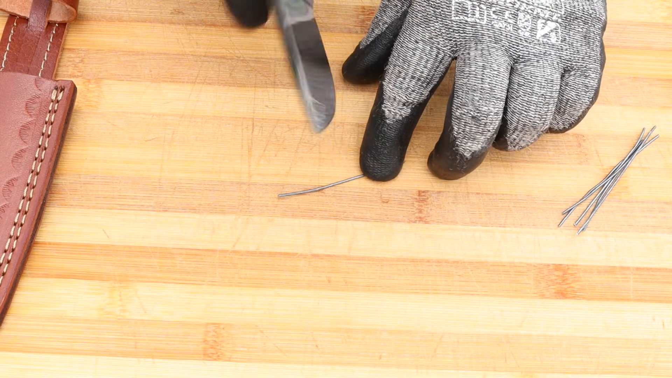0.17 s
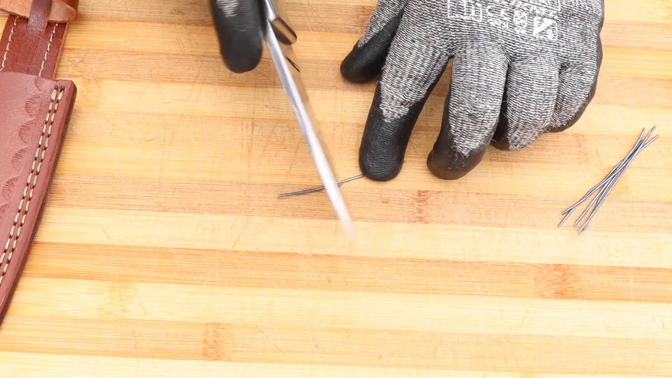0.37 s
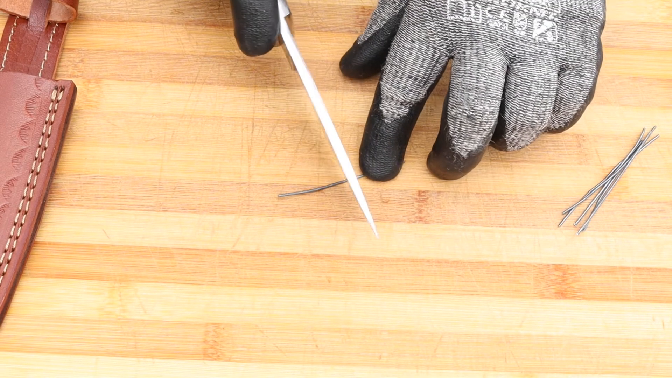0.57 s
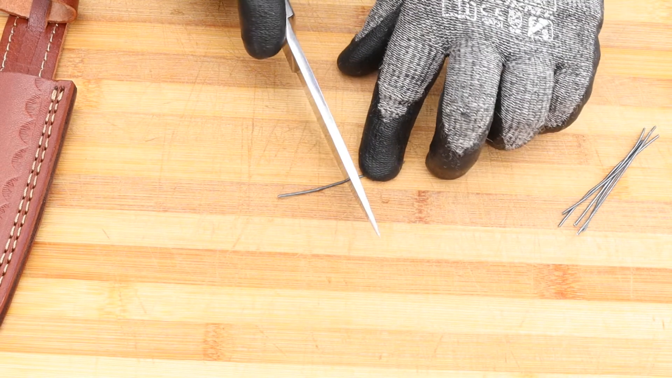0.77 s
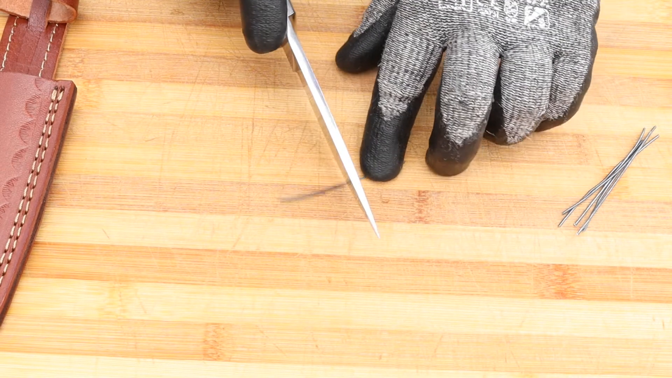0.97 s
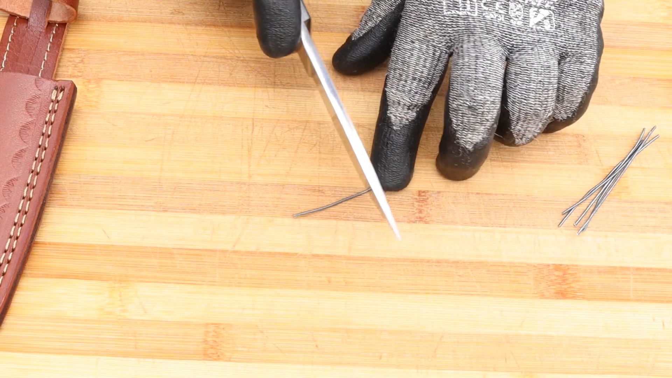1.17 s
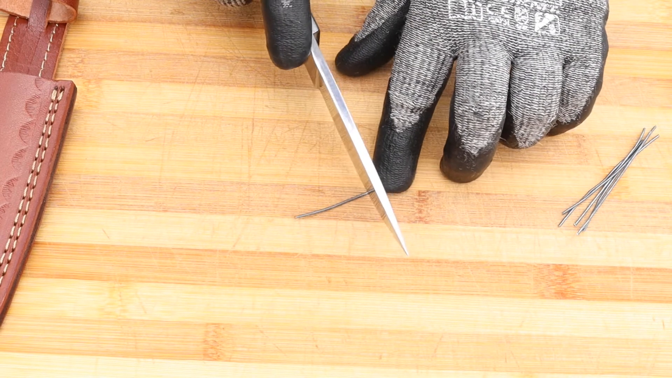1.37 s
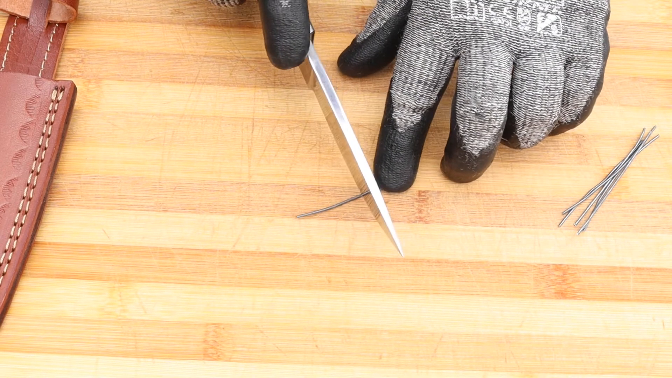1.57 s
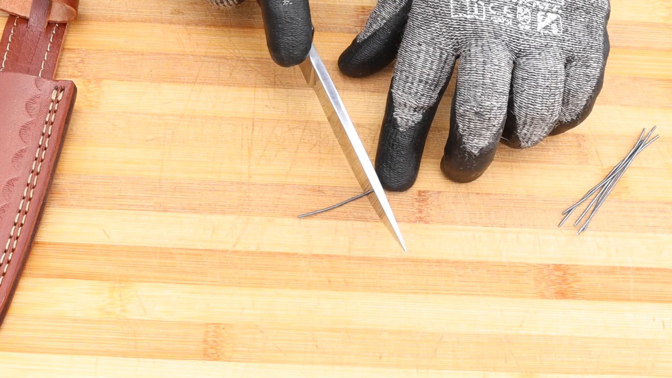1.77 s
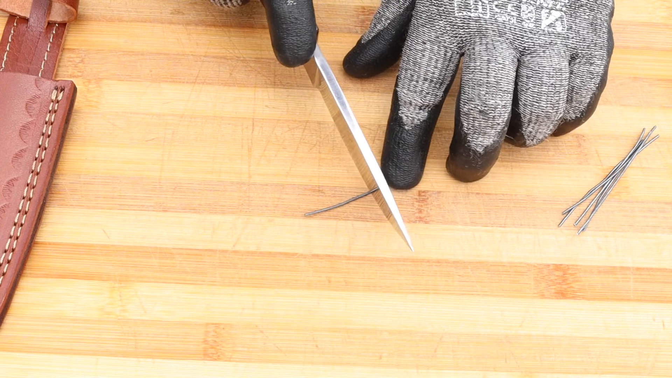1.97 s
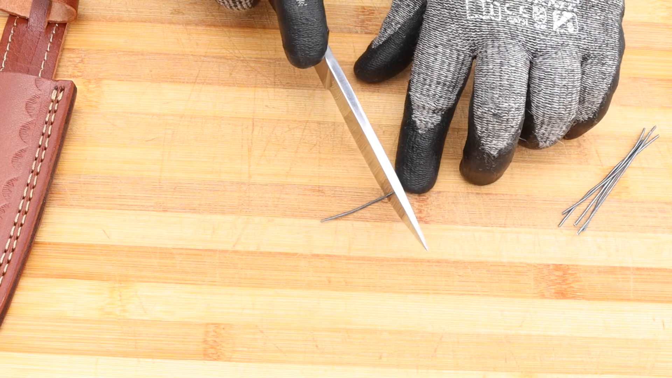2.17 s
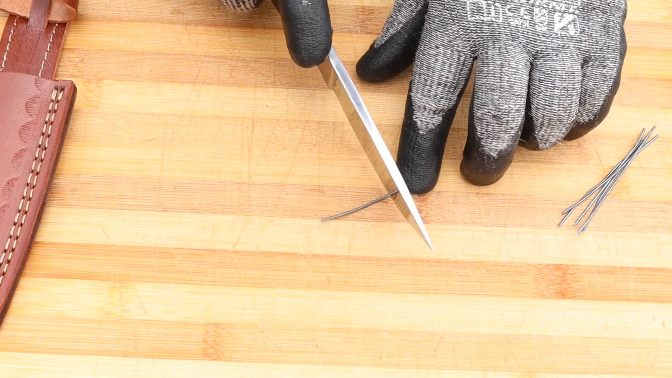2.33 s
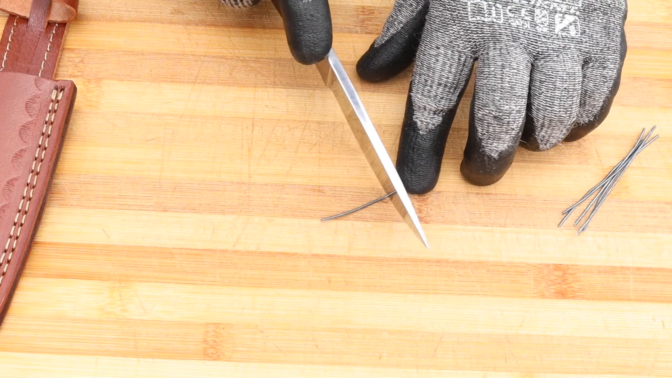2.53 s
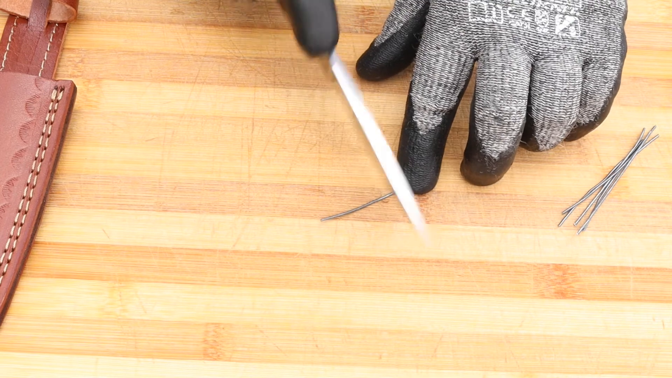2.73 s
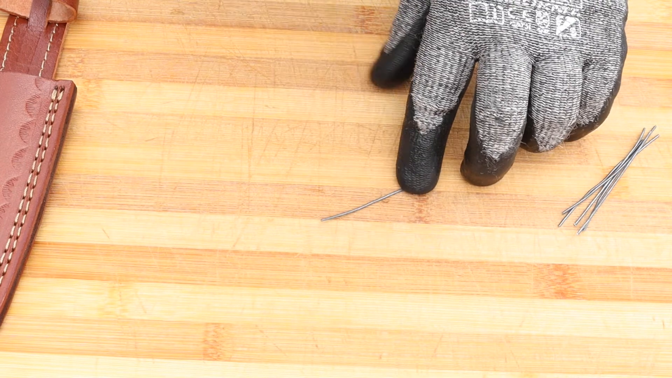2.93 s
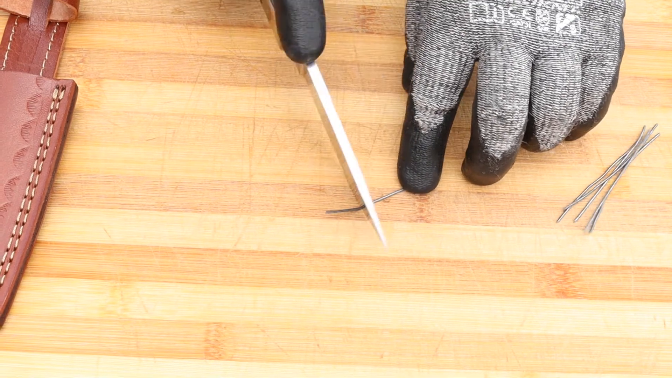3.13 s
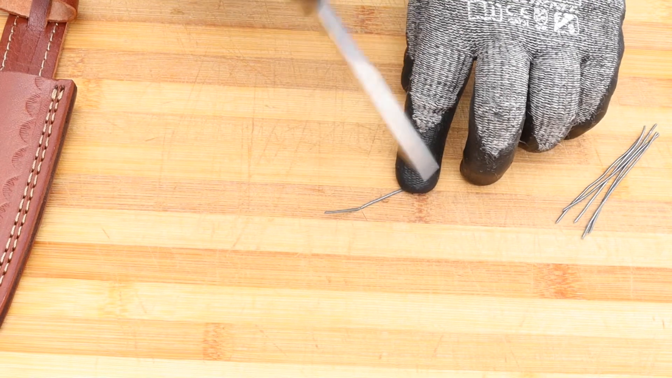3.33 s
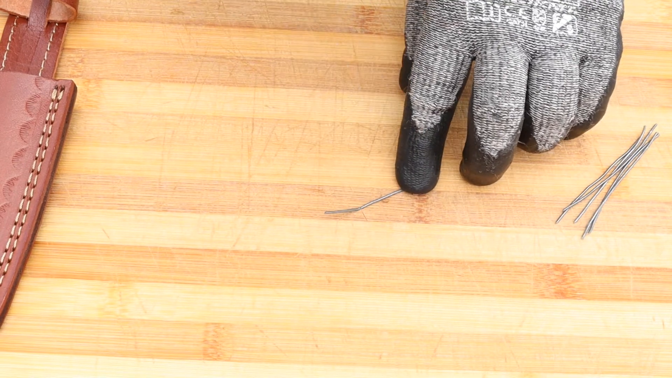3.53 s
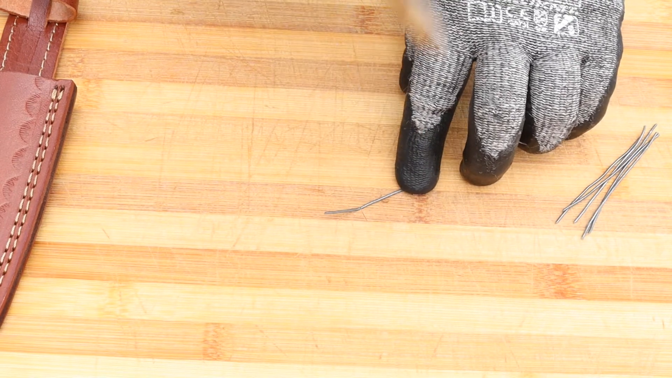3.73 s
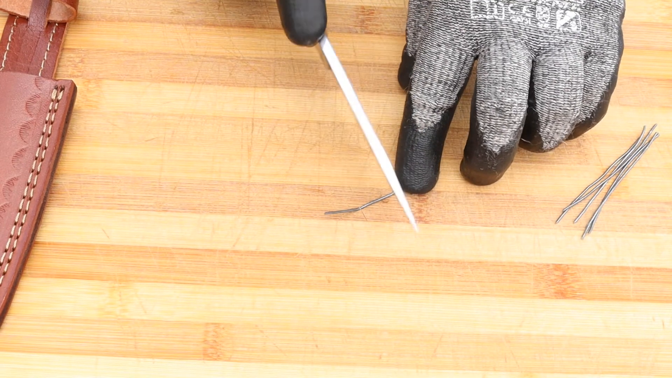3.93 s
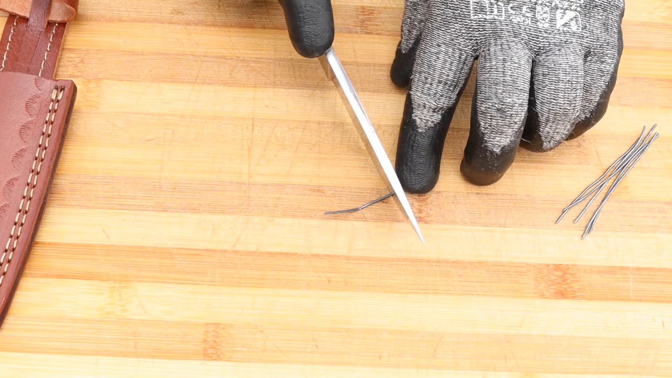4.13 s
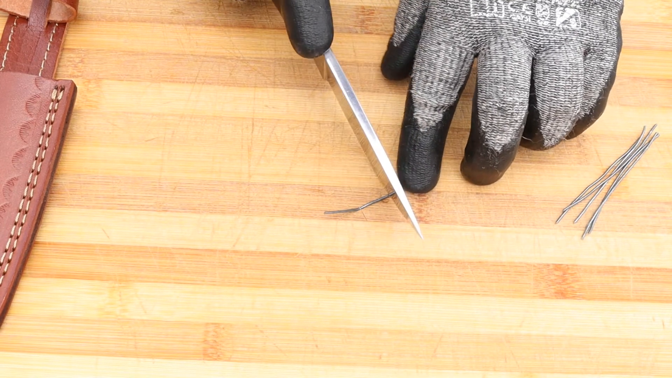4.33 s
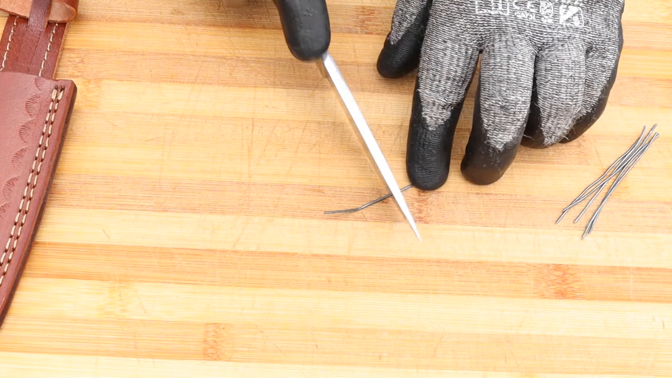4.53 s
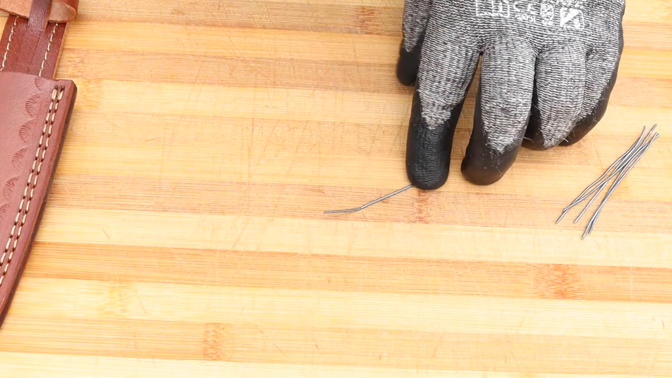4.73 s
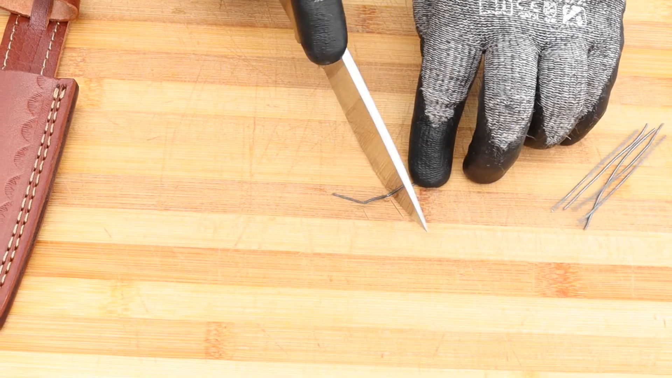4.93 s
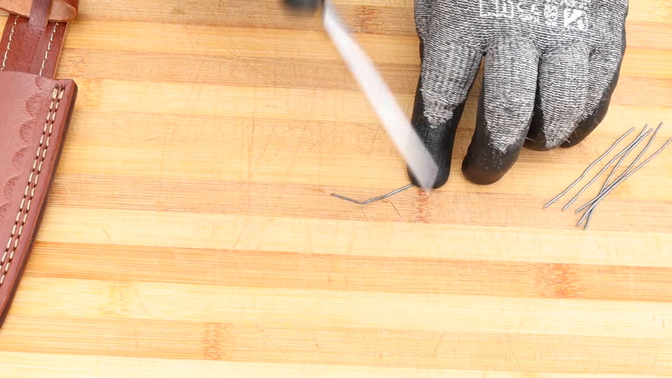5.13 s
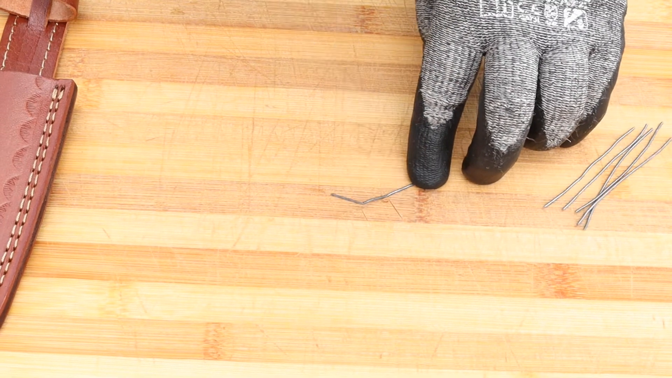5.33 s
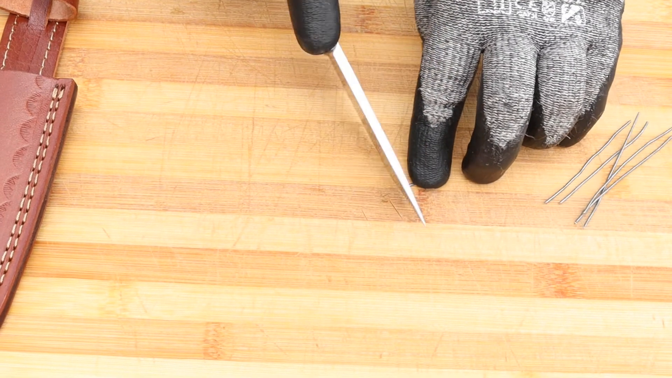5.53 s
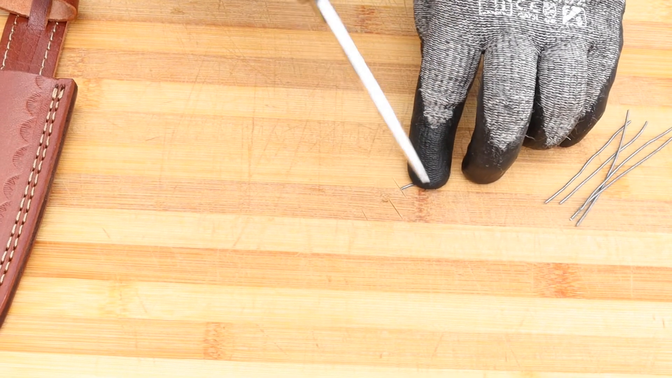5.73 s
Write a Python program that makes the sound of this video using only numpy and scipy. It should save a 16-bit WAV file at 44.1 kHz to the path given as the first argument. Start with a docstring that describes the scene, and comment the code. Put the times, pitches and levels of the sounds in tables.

```python
"""A steel knife is chopped and pressed onto thin wire lying on a wooden board, outdoors.
Each contact is a set of short fading tones (the board and blade ringing) plus a crack of noise.
Walls nearby send back dull echoes, made from a scatter of noise. Scrapes, glove rustle, air hiss, an engine
drone, street murmur and wind are shaped noise and one wavering tone. Hard chops overload the recorder and
make its gain control duck."""
import sys
import numpy as np
from scipy import signal
from scipy.io import wavfile

SR = 44100
rng = np.random.default_rng(int(sys.argv[2]) if len(sys.argv) > 2 else 0)


def volts_from_db(level):
    """Convert decibel levels to linear amplitude ratios."""
    exponent = np.asarray(level, float) / 20
    return 10 ** exponent


def to_wav(s):
    """Save 16-bit WAV."""
    ch = np.atleast_2d(s).T  # columns
    pcm = np.round(np.clip(ch, -1, 1) * 32767)  # PCM
    wavfile.write(sys.argv[1], SR, pcm.astype(np.int16))


N = 255424
LEAD = round(0.3 * SR)   # samples made ahead of the start, so that an earlier blow can still ring


def rms_one(x):
    """Scale a sound to an average strength (rms) of 1."""
    return x / np.sqrt(np.mean(x ** 2) + 1e-20)


def in_time(rows):
    """Draw straight lines between timed rows: one curve for each column after the time."""
    s, *columns = np.transpose(rows)
    return [np.interp(np.arange(N) / SR, s, column) for column in columns]


def at_hz(points, hz):
    """Read a level off a curve of (Hz, dB) points, with pitch on a log scale."""
    points = np.array(points)
    return np.interp(np.log(hz), np.log(points[:, 0]), points[:, 1])


def drift(rate_hz):
    """Slow chance of spread 1: noise passed twice through a one-pole low-pass."""
    step = 40   # samples between the points computed
    r = np.exp(-2 * np.pi * step * rate_hz / SR)
    noise = rng.standard_normal(N // step + 2002)
    slow = signal.lfilter([1], [1, -2 * r, r * r], noise)[2000:]   # skip the filter's start
    return np.interp(np.arange(N) / step, np.arange(len(slow)), rms_one(slow))


def coloured_noise(spectrum, patchy_db, rate_hz):
    """Third-octave bands of noise, flickering partly together and partly alone; rms 1."""
    edges = spectrum[0][0] * 2 ** (np.arange(40) / 3)
    edges = edges[edges < min(spectrum[-1][0] * 1.3, 0.45 * SR)]
    out, together, white = 0, drift(rate_hz), rng.standard_normal((2, N))
    for k, (low, high) in enumerate(zip(edges, edges[1:])):
        band_filter = signal.butter(2, [low, high], "band", fs=SR, output="sos")
        band = signal.sosfilt(band_filter, white[k % 2])   # neighbours use different noise
        level_db = at_hz(spectrum, np.sqrt(low * high))
        out = out + band * volts_from_db(level_db + patchy_db * (together + drift(rate_hz)))
    return rms_one(out)


def all_blows():
    """List every contact and tick as time, force and colour; harder contacts get a slightly duller edge."""
    # blade on wire and board: start_s [s], force_db [dB], thump_db, middle_db, upper_ring_db [dB]
    contacts = [(-0.17, 12.5, 4, -46, -2), (0.5, 2, -36, 2.5, -3.5), (0.5288, -14.5, -1, -1, -13),
                (0.6827, -3.5, -8, 0.5, -4.5), (0.6931, -16, 16, -15, -4), (0.6985, -14, -17, -1, -10),
                (1.066, -27, -14, -5, -3), (1.5460, -9.5, 21.5, -1.5, 7), (1.5666, -11.5, -3, -4, -7),
                (1.6837, -15.5, 20.5, -2, -6.5), (1.6949, -23, 20, 10.5, -5), (1.794, -20, 25, 10, -29),
                (1.805, -11.5, 4, -41, -14.5), (1.8134, -14, 6, -6, -25), (2.0095, -13.5, 16, -13, -11.5),
                (2.0230, -14.5, -11, -12, -14), (2.2765, -18.5, -12, -22, -16),
                (2.5638, -1.5, -4, -5, -10.5), (2.5672, -7, -8, -11, 1), (2.7, 0.5, -24, 2.5, -4),
                (2.707, -7, 13.5, -7, -8.5), (3.12, 17.5, -37, 3, 3.5), (4.2062, -19, 26.5, -61, 13),
                (4.3294, -8.5, 24, -21, 0), (4.3313, -1, -25, -28, -9.5), (4.341, -11.5, 29, 2.5, 9.5),
                (4.924, 16.5, -32, 5, 3.5), (5.4748, 16.5, -30, 5, 1)]
    # the loose wire end ticks on the steel: start_s [s], force_db [dB]
    ticks = [(2.575, -26), (2.713, -40), (3.2200, -24.5), (4.2170, -35), (4.9840, -29), (5.453, -37)]
    # colour of every tick: thump_db, middle_db, upper_ring_db, steel_edge_db [dB]
    tick_colour = [11, 13, 13, 23]
    blows = []
    for row in contacts:
        steel_edge_db = 3.5 + 0.63 * row[-1] - 0.078 * row[1]   # from upper ring and force
        blows.append((*row, steel_edge_db))
    for row in ticks:
        blows.append((*row, *tick_colour))
    return blows


def knife_on_board():
    """Each blow sets all the modes ringing and adds a steel crack; gives the near sound and its first burst."""
    # pitches of the colour points [Hz]: thump, main ring, middle, upper ring, steel edge
    colour_hz = [190, 570, 850, 1230, 3500]
    # board and blade modes: pitch_hz [Hz], level_db [dB], t60_s [s to fade by 60 dB]
    modes = [(208, -30, 0.07), (301, -14.5, 0.019), (455.5, -32, 0.13), (558, -9, 0.052),
             (602, -4.5, 0.033), (773, -1.5, 0.017), (919, -3, 0.015), (1179, -14.5, 0.055),
             (1246.7, -15.5, 0.047), (1303, -13.5, 0.012), (1728, -19.5, 0.02), (1973, -44, 0.09),
             (2646, -27.5, 0.037), (3160, -23.5, 0.019), (4130, -27, 0.018), (5027, -26, 0.021),
             (5990, -31.5, 0.016), (9560, -25, 0.011)]
    detune = 0.01              # pitch spread between spots on the board (a share), wider for high modes
    rise_s = 0.00041           # swell time of a 0 dB contact
    crack_db, crack_t60_s = -19.5, 0.013
    crack_low_hz, crack_high_hz = 1850, 11600   # the upper edge is for 0 dB force and 0 dB steel edge
    burst_t60_s = 0.022        # mostly the first burst of a blow carries as far as the walls

    out, t = np.zeros((2, N + LEAD + SR)), np.arange(SR // 5) / SR
    hz, level_db, t60_s = np.transpose(modes)[:, :, None]
    spread = 1 + hz / 2000     # high modes vary more from blow to blow
    blows = all_blows()
    luck = rng.standard_normal((len(blows), 3, len(modes), 1))
    for (s, force_db, thump_db, *upper_db), (louder, higher, shift) in zip(blows, luck):
        edge_db = upper_db[-1]
        # the main ring follows the force alone, so its colour is 0 dB
        colour_db = at_hz(np.c_[colour_hz, [thump_db, 0, *upper_db]], hz)
        gain = volts_from_db(force_db + colour_db + level_db + spread * louder - 60 * t / t60_s)
        phase = 2 * np.pi * hz * (1 + detune * spread * higher) * t
        phase = phase + shift * np.minimum(hz / 2500, 2)   # high modes arrive out of step
        ring = (gain * np.sin(phase)).sum(axis=0)

        # hard steel blows crack brighter
        top_hz = min(crack_high_hz * volts_from_db(0.24 * force_db + 0.2 * edge_db), 0.4 * SR)
        crack_band = signal.butter(2, [crack_low_hz, top_hz], "band", fs=SR, output="sos")
        crack = signal.sosfilt(crack_band, rng.standard_normal(len(t)))
        crack = crack * volts_from_db(force_db + edge_db + crack_db - 60 * t / crack_t60_s)

        swell = 1 - np.exp(-t / (rise_s * volts_from_db(-0.55 * force_db)))   # light touches swell more slowly
        blow = swell * (ring + crack)
        at = round(s * SR) + LEAD
        out[:, at:at + len(t)] += blow, blow * volts_from_db(-60 * t / burst_t60_s)
    return out[:, :N + LEAD]


def wall_echoes(bursts):
    """Dense dull reflections: noise whose level follows the delay, passed through a few broad peaks."""
    # echoes from the surroundings: delay_s [s], level_db [dB]
    echo_points = [(0.023, -90), (0.037, -50), (.055, -54), (.15, -58), (0.243, -67), (.275, -80),
                   (.33, -79)]
    # what the echoes favour: pitch_hz [Hz], width_hz [Hz], level_db [dB]
    echo_peaks = [(544, 96, 1.5), (850, 270, -10), (1185, 105, 4), (1624, 48, -5), (1806, 50, -3.5),
                  (2770, 780, 1.5), (4320, 2900, -10)]
    delay_s, echo_db = np.transpose(echo_points)
    t = np.arange(round(delay_s[-1] * SR)) / SR
    dense = rng.standard_normal(len(t)) * volts_from_db(np.interp(t, delay_s, echo_db)) * (t > delay_s[0])
    t_lumps = np.arange(0, t[-1] + 0.01, 0.007)
    lumps_db = 1.5 * rng.standard_normal(len(t_lumps))
    dense *= volts_from_db(np.interp(t, t_lumps, lumps_db))   # walls answer in clumps
    response = 0
    for k, (hz, width_hz, peak_db) in enumerate(echo_peaks):
        r = np.exp(-np.pi * width_hz / SR)
        resonance = [1, -2 * r * np.cos(2 * np.pi * hz / SR), r * r]
        peak = signal.lfilter([(1 - r * r) / 2, 0, (r * r - 1) / 2], resonance, dense)
        response = response + (-1) ** k * volts_from_db(peak_db) * peak   # alternate signs
    return signal.fftconvolve(bursts, response)[:len(bursts)]


def scrapes():
    """Blade and glove slide: uneven noise grains through one resonance, swelling and fading each stroke."""
    # sliding on wire and wood: start_s [s], end_s [s], centre_hz [Hz],
    # level_db [dB rms before the swell], width [share of the centre, each way]
    strokes = [(0.34, 0.464, 3350, -54, 0.025), (0.406, 0.595, 1850, -44, 0.29),
               (0.916, 1.317, 7800, -55, .3), (4.38, 4.54, 4700, -52.5, 0.11), (5.35, 5.48, 5560, -57, .2),
               (5.45, 5.72, 4430, -40, 0.17)]
    out, t = np.zeros(N), np.arange(N) / SR
    for start, end, hz, level_db, width in strokes:
        grains = rng.standard_normal(N) * volts_from_db(1.2 * drift(60))
        band = signal.butter(1, [hz / (1 + width), hz * (1 + width)], "band", fs=SR, output="sos")
        stroke = np.sin(np.pi * np.clip((t - start) / (end - start), 0, 1))
        out += volts_from_db(level_db) * stroke * rms_one(signal.sosfilt(band, grains))
    return out


def hiss_and_rustle(murmur_db):
    """Air hiss breathes with the street murmur and swells with each rustle of the glove, then drops back."""
    # the glove rustles as the knife comes down: start_s [s], end_s [s], level_db [dB above the hiss]
    rustles = [(0.155, 0.48, 2.0), (0.845, 1.225, 0.5), (3.005, 3.143, 2.5), (5.392, 5.465, 8)]
    # colour of the hiss: pitch_hz [Hz], level_db [relative dB per Hz]
    hiss_colour = [(1290, -31), (2200, -8.5), (2490, -3), (3650, -3.5), (5000, -2), (5440, -3),
                   (8950, -4.5), (12800, -8.5), (15100, -16), (16000, -19)]
    t = np.arange(N) / SR
    # -51.5 dB at the mean murmur level; 0.53 is the share of the murmur's swing
    level_db = -51.5 + 0.53 * (murmur_db - murmur_db.mean())
    for start, end, rustle_db in rustles:
        rise = np.sin(np.pi / 2 * (t - start) / (end - start))
        level_db = level_db + rustle_db * rise * (t > start) * (t < end)
    return volts_from_db(level_db) * coloured_noise(hiss_colour, patchy_db=1.0, rate_hz=15.6)


def engine_drone():
    """A far engine's low hum: one sine whose pitch slides and whose level wavers."""
    # path of the hum: start_s [s], pitch_hz [Hz], level_db [dB rms before the waver]
    path = list([(1.2, 62.5, -49), (1.256, 66.1, -53), (1.576, 66, -41.5), (1.75, 63, -54),
                 (1.776, 65.6, -40.5), (1.874, 74.7, -48), (2.017, 80, -40), (2.1, 74.6, -57)])
    fade_in = (path[0][0] - 0.1, path[0][1], -80)
    fade_out = (path[-1][0] + 0.083, path[-1][1], -80)
    hz, level_db = in_time([fade_in] + path + [fade_out])
    hum = np.sin(2 * np.pi * np.cumsum(hz) / SR)
    return np.sqrt(2) * volts_from_db(level_db + 2.1 * drift(24)) * hum


def street_murmur(murmur_db):
    """Distant traffic: low and middle noise whose bands flicker slightly."""
    # colour of the murmur: pitch_hz [Hz], level_db [relative dB per Hz]
    murmur_colour = [(71, -50), (120, -1.5), (284, -3), (476, -12.5), (514, -3.5), (607, -9), (838, -8.5),
                     (2600, -20), (3380, -31), (5720, -120)]
    return volts_from_db(murmur_db) * coloured_noise(murmur_colour, patchy_db=0.36, rate_hz=20.0)


def wind(wind_db):
    """Wind on the microphone: very low noise that swells and wavers slowly."""
    # colour of the wind: pitch_hz [Hz], level_db [relative dB per Hz]
    wind_colour = [(16, 13.5), (25, -8.5), (40, -4), (80, -1.5), (130, -14.5), (200, -18)]
    return volts_from_db(wind_db) * coloured_noise(wind_colour, patchy_db=-2.5, rate_hz=4.0)


def scene():
    """Add up the knife, its echoes and the sounds around them, as one channel."""
    # levels of the surroundings: start_s [s], wind_db [dB], murmur_db [dB]
    surroundings = [(0.0, -47, -48), (0.17, -35.5, -45.5), (0.25, -37.5, -45.5), (0.34, -38, -45.5),
                    (0.78, -49, -49.5), (1.0, -43, -44.5), (1.274, -48, -46), (1.52, -40.5, -47),
                    (1.97, -51, -46.5), (2.3, -44.5, -46), (2.53, -46.5, -46), (2.9, -41, -48),
                    (3.6, -43, -46.5), (4.05, -42, -46.5), (4.48, -47, -47.5), (4.78, -43.5, -47.5),
                    (5.3, -48.5, -46.5), (5.79, -41.5, -50)]
    wind_db, murmur_db = in_time(surroundings)
    hits, bursts = knife_on_board()
    knife = (hits + wall_echoes(bursts))[LEAD:]
    air = wind(wind_db) + street_murmur(murmur_db) + hiss_and_rustle(murmur_db)
    return (knife + air + scrapes() + engine_drone())[None]


def gain_control(dry):
    """Loud peaks pull the gain down within milliseconds; it is held at its deepest cut, then climbs back."""
    threshold_db, hold_ratio = 8, 8       # hold_ratio: dB of hold stored per dB over the threshold
    most_stored_db, deepest_cut_db = 31, 15   # storing more than the deepest cut makes the hold
    recovery_db_per_s, attack_s = 120, 0.0017
    level_db = 20 * np.log10(np.abs(dry[0]) + 1e-9)
    over_db = np.minimum(hold_ratio * (level_db - threshold_db), most_stored_db)
    climb_db = recovery_db_per_s * np.arange(N) / SR
    stored_db = np.maximum.accumulate(over_db + climb_db) - climb_db
    cut_db = np.clip(stored_db, 0, deepest_cut_db)
    r = np.exp(-1 / (attack_s * SR))
    for _ in range(2):   # smooth the cut twice
        cut_db = signal.lfilter([1 - r], [1, -r], cut_db)
    return dry * volts_from_db(-cut_db)


def low_pass(x):
    """Removes everything above the highest recorded frequency."""
    return signal.sosfilt(signal.butter(12, 16520, fs=SR, output="sos"), x)


def record(dry):
    """The recorder ducks, clips hard on overload and passes nothing much above its top pitch."""
    clipped = np.clip(gain_control(dry), -0.95, 0.95)
    top_filter = signal.cheby2(8, 40, 16900, fs=SR, output="sos")   # 40 dB down from 16900 Hz up
    mix = signal.sosfilt(top_filter, clipped)
    return low_pass(mix)


dry = scene()
out = record(dry)
to_wav(out)
```